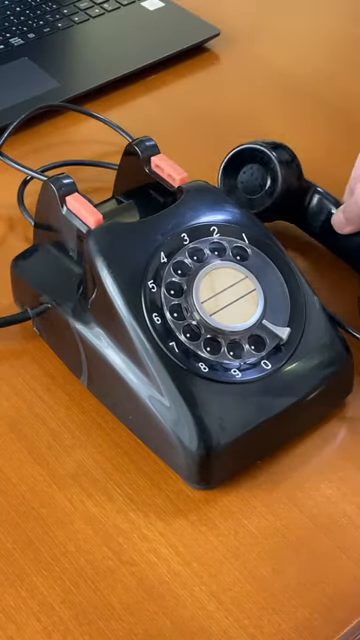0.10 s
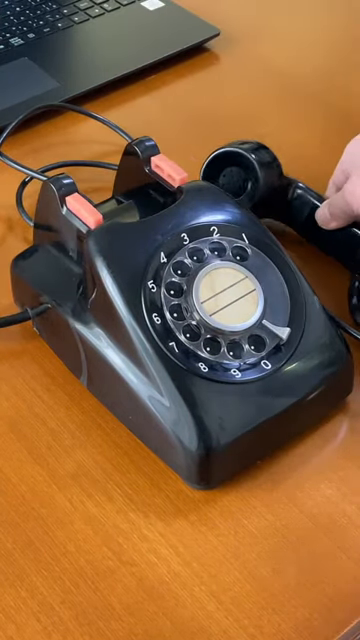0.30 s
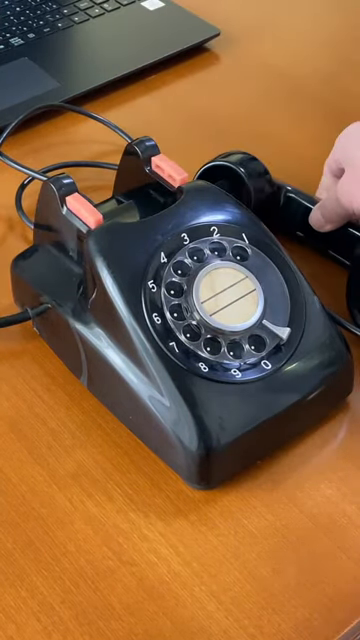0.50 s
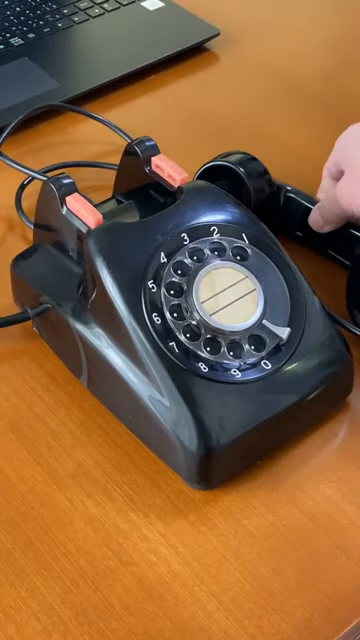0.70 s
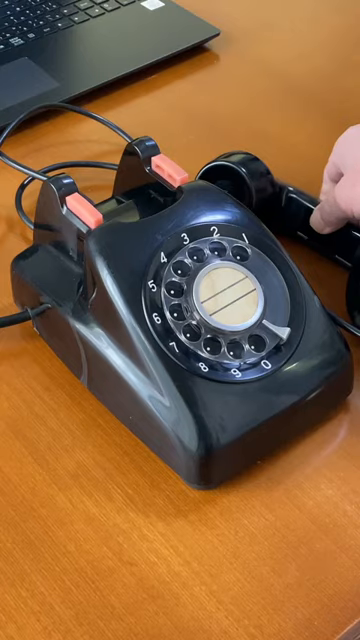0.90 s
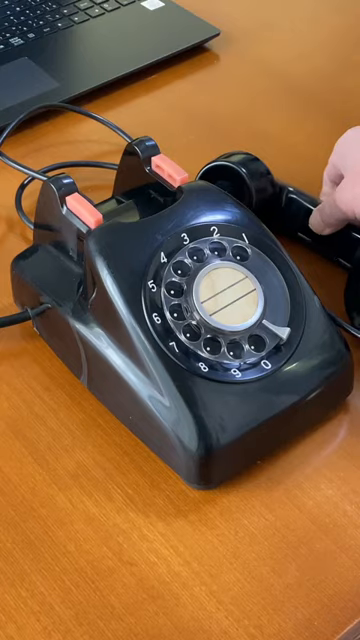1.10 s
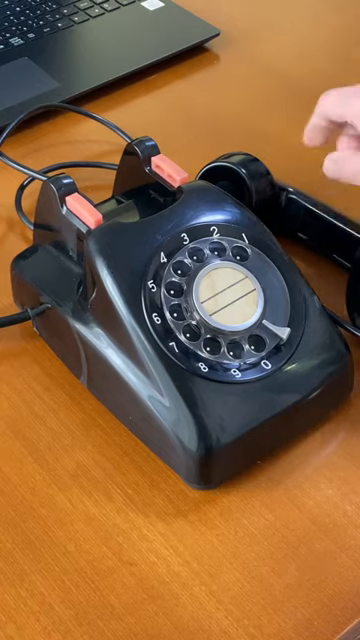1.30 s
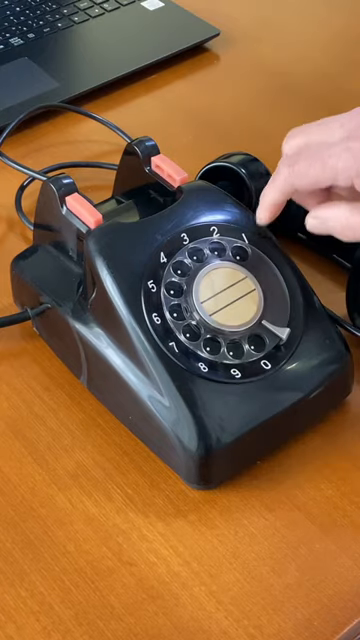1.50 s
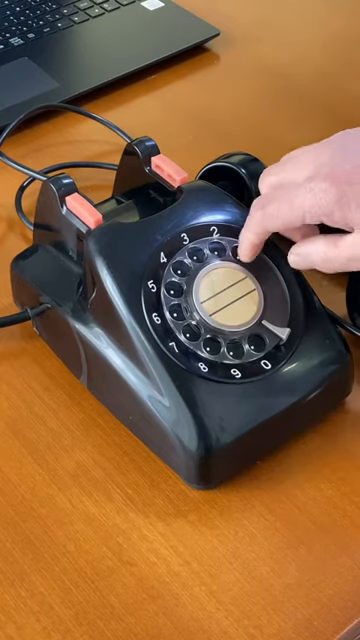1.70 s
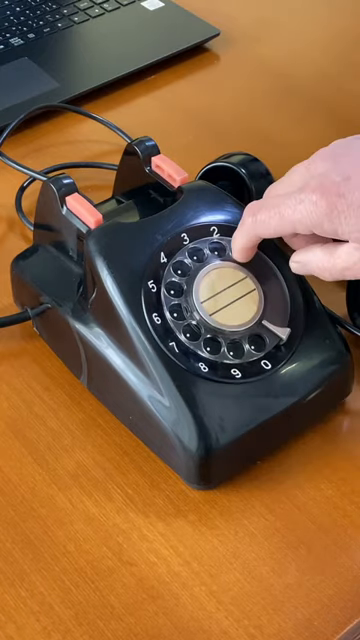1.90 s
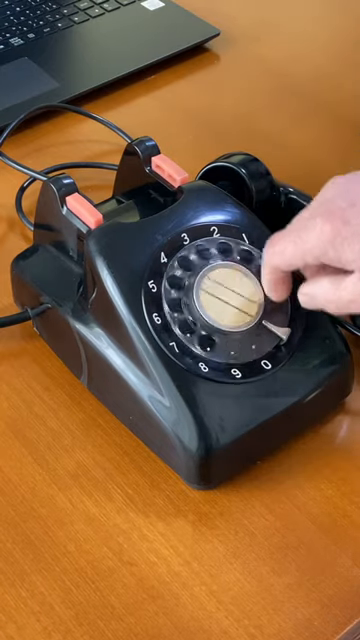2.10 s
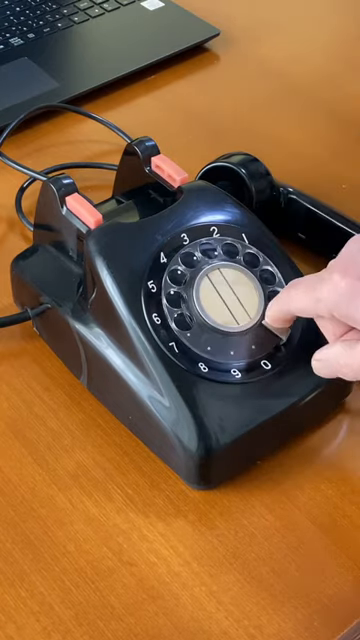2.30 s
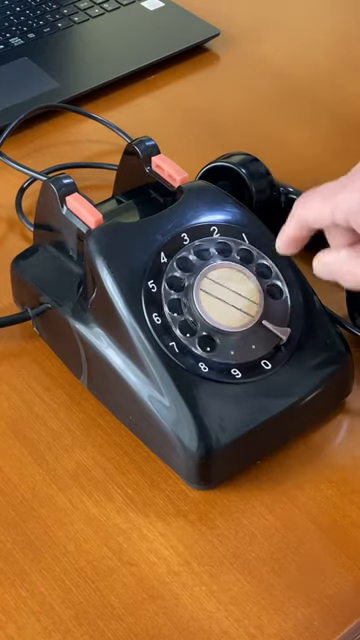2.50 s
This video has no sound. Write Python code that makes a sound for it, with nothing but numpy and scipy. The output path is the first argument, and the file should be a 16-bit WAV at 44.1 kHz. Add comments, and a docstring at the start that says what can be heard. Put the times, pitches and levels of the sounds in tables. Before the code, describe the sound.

A telephone handset clunks onto a wooden desk, then a rotary dial winds and whirs back.

```python
"""A telephone handset knocks down on a wooden desk, one end then the other, each with a small rattle:
its hard shell cracks and the desk thuds and rings. The hand slides softly off it.
A finger winds the rotary dial, gears rasping and ratchet ticking, and lets go; the dial runs back,
governor whirring, contacts clicking. A small room answers, over a low steady hum."""
import sys
import numpy as np
from scipy import signal
from scipy.fft import rfft, irfft
from scipy.io import wavfile
from scipy.ndimage import uniform_filter1d

SR = 44100
rng = np.random.default_rng(int(sys.argv[2]) if len(sys.argv) > 2 else 0)


def transcribe(u):
    """Save the signal u as a 16-bit wav file named by the first command-line argument.

    u: samples, shape (n,) or (channels, n), limited to [-1, 1]; the rate is SR.
    q: integer samples, one column per channel.
    """
    v = np.clip(np.atleast_2d(u).T, -1, 1)
    q = np.round(v * 32767).astype(np.int16)
    wavfile.write(sys.argv[1], SR, q)


N = 114660
HANDSET_LAG_MS, DIAL_LAG_MS = 0.1, -0.113  # handset: left channel behind right; dial: right channel behind left

# handset on desk (time [s], thud [dB], crack [dB], tick [dB])
KNOCKS = [(0.078, -53.5, -64, -74), (0.144, -63.5, -60, -81), (0.2423, -10.5, -33, -36.5),
          (0.245, -26, -25.5, -57), (0.277, -17.5, -29, -43), (0.307, -32.5, -34, -58),
          (0.3502, -6.5, -17, -31.5), (0.353, -22, -30.5, -54.5), (0.3587, -16, -32.5, -53),
          (0.3885, -20, -26, -46), (0.413, -51, -37, -68)]
# shell crack spectrum (frequency [Hz], level [dB])
CRACK_SPECTRUM = [(200, -15.5), (700, -6.5), (1100, -2.5), (1700, 0.5), (1930, -7), (2300, -5),
                  (3000, -8.5), (3800, -18), (4500, -18), (5600, -24.5), (9000, -30.5), (16000, -58.5)]
# shell modes (frequency [Hz], level [dB], t60 [s])
SHELL_MODES = [(1030.6, 3, .09), (1233, 2, 0.16), (1482, -6, 0.19), (1603, 5, .08), (1781, -1, 0.11),
               (2083, -6, 0.22), (2255, 11.5, 0.016), (2345, -5.5, .15), (2778, 4, 0.018), (3314, -10, .11),
               (4394, -5.5, 0.034)]
def handset_knocks():
    """Each knock cracks in the shell; the desk gives way just after."""
    thud_delay_s = 0.0017
    desk_hits = blows([(s + thud_delay_s, db) for s, db, _, _ in KNOCKS], 1)
    shell_hits = blows(KNOCKS, 2)
    thuds = through(desk_hits, desk_response())
    crack = body(CRACK_SPECTRUM, ring_s=0.0022, room_db=-1, coherence=0.53, lag_ms=HANDSET_LAG_MS)
    cracks = amp(-3) * through(shell_hits, crack)
    shell = amp(-3.5) * through(shell_hits, ringing(SHELL_MODES, spread_cycles=0.22))
    ticks = bright_ticks(blows(KNOCKS, 3), ring_s=0.0017, room_db=-7.5, coherence=0.35,
                         lag_ms=HANDSET_LAG_MS)
    return thuds + pan(-0.43) * (cracks + shell) + ticks


# desk and handset modes (frequency [Hz], level [dB], t60 before cap [s], left-right [dB])
DESK_MODES = [(107.3, -18.5, 0.3, 6), (205.45, -4.5, 0.23, 1), (239.8, -11.5, 0.26, 7),
              (259.7, -7.5, 0.29, 3.5), (285, -21, 0.47, 1.5), (312, -17, 0.44, 3.5), (401.9, -8, 0.26, 5),
              (439.4, -9, 0.3, 3.5), (576, -17, 0.38, 5.5), (629, -4, .28, 2), (773.6, -11, 0.22, 0),
              (993, -15, 0.19, 0.5), (995, -16.5, 0.2, -2.5), (1144, -17, 0.21, 2)]
# dull thud spectrum (frequency [Hz], level [dB])
THUD_SPECTRUM = [(40, -32.5), (80, -2), (150, -12), (215, 3.5), (450, 1.5), (640, -5), (860, -11),
                 (1300, -16), (3000, -50.5), (16000, -94.5)]
def desk_response():
    """The struck desk thuds and rings in its modes; a metal part rings on faintly."""
    rise_s, left_lag_s, max_t60_s = 0.0019, 0.00035, 0.42
    t = np.maximum(np.arange(N) / SR - np.array([[left_lag_s], [0]]), 0)
    modes = [(hz, db, min(t60, max_t60_s), side_db) for hz, db, t60, side_db in DESK_MODES]
    modes.append((578, -55.5, 1.7, 3))  # metal part
    ring = sum((-1) ** k * pan(side_db) * amp(db - 60 * t / t60) * np.sin(2 * np.pi * hz * t)
               for k, (hz, db, t60, side_db) in enumerate(modes))
    ring *= 1 - np.exp(-t / rise_s)
    thud = body(THUD_SPECTRUM, ring_s=0.0063, room_db=-1.5, coherence=0.2415, lag_ms=0.16)
    return amp(2) * ring / np.linalg.norm(ring[0]) + amp(-3.5) * pan(2.1) * thud


# bright tick spectrum (frequency [Hz], level [dB])
TICK_SPECTRUM = [(500, -25.5), (2500, 0), (4500, -2.5), (5600, -8), (6700, 0.5), (8700, 1.5), (10500, -3),
                 (11800, -25), (14000, -5.5), (16000, -19.5)]
def bright_ticks(hits, **settings):
    """The treble edge of each impact, on handset or dial."""
    return through(hits, body(TICK_SPECTRUM, **settings))


# slide envelope (time [s], level [dB])
SLIDE_ENVELOPE = [(0.06, -74.5), (0.09, -71), (0.2, -72), (0.222, -58.5), (0.24, -38.5), (0.26, -49),
                  (0.325, -47), (0.347, -25.5), (0.36, -48.5), (0.6, -75.5), (0.66, -94)]
# slide spectrum (frequency [Hz], level [dB])
SLIDE_SPECTRUM = [(100, -13.5), (220, 0.5), (500, 0), (900, -17.5), (2500, -16), (4700, -27.5), (6000, -42),
                  (16000, -57.5)]
def handset_slide():
    """The handset catches and rubs on the wood as it settles."""
    friction = envelope(SLIDE_ENVELOPE) * rasp(rate_hz=298.3, jitter=0.4, rough=1, rub=0.79)
    return through(friction, body(SLIDE_SPECTRUM, ring_s=0.0023, room_db=0.5, coherence=0.783))


# ratchet ticks (time [s], level [dB])
RATCHET_TICKS = [(1.978, -59.5), (1.9905, -56), (2.0415, -47), (2.046, -70), (2.086, -62), (2.091, -49),
                 (2.0988, -43), (2.1285, -67), (2.1375, -57), (2.1455, -50.5), (2.15, -61), (2.1715, -56.5),
                 (2.182, -81)]
# ratchet spectrum (frequency [Hz], level [dB])
RATCHET_SPECTRUM = [(300, -7.5), (2000, -7), (4500, 3), (5500, -8.5), (6500, -1), (8700, 2.5), (10200, -7),
                    (11700, -36), (14300, 5.5), (16000, -7.5)]
# gear envelope (time [s], level [dB])
GEAR_ENVELOPE = [(1.955, -70), (1.967, -60), (2.04, -56.5), (2.07, -56), (2.1, -52.5), (2.145, -49),
                 (2.18, -59.5), (2.21, -77.5), (2.27, -104), (2.295, -74), (2.33, -82)]
# gear spectrum (frequency [Hz], level [dB])
GEAR_SPECTRUM = [(200, -22), (400, -4), (750, -22.5), (1180, -1.5), (1650, -8.5), (2200, -21),
                 (4400, -20.5), (5500, -50.5), (8600, -25), (11700, -47), (15000, -27)]
# finger wheel modes (frequency [Hz], level [dB], t60 [s])
WHEEL_MODES = [(430, -12.5, 0.059), (1220, -7, 0.072), (1154, -2.5, 0.071), (1300, -5.5, 0.054),
               (1407.4, -4, 0.042), (1529, -2.5, 0.03), (1650, 0, 0.074), (1715, 0, 0.061)]
def dial_winding():
    """The finger drives the gears; their teeth ring the wheel while the ratchet ticks."""
    teeth = envelope(GEAR_ENVELOPE) * rasp(rate_hz=161.2, jitter=0.22, rough=0.45, rub=0.3)
    ratchet = body(RATCHET_SPECTRUM, ring_s=0.0039, room_db=-11, coherence=0.79, lag_ms=DIAL_LAG_MS)
    gears = body(GEAR_SPECTRUM, ring_s=0.0026, room_db=-9.5, coherence=0.13, lag_ms=DIAL_LAG_MS)
    ticks = through(blows(RATCHET_TICKS, 1), ratchet)
    wheel = amp(-3) * through(teeth, ringing(WHEEL_MODES, spread_cycles=0.46))
    return ticks + amp(-0.5) * through(teeth, gears) + wheel


# governor envelope (time [s], level [dB])
GOVERNOR_ENVELOPE = [(2.33, -75), (2.36, -56), (2.378, -51), (2.386, -50.5), (2.435, -45.5), (2.465, -46.5),
                     (2.52, -50), (2.6, -49.5)]
# governor spectrum (frequency [Hz], level [dB])
GOVERNOR_SPECTRUM = [(230, -17.5), (420, 8), (700, 1.5), (1200, 2.5), (1450, 0), (2000, -19), (2550, -17.5),
                     (3200, -5.5), (4300, -8), (5500, -23), (6500, -13.5), (8700, -13.5), (12000, -36),
                     (15000, -49)]
# catch and pulse contacts (time [s], clack [dB], case knock [dB], ping [Hz], ping [dB], tick [dB])
CLACKS = [(1.96, -71.5, -86, 2290, -62.5, -72), (2.382, -44, -44.5, 1178, -44, -60),
          (2.407, -49, -47, 1162, -48, -57), (2.4183, -48, -40.5, 2500, -49.5, -54),
          (2.4314, -49, -41, 1200, -51, -46.5), (2.4362, -45.5, -47, 2530, -55, -56),
          (2.5145, -47.5, -76, 2248, -48, -59), (2.523, -49, -60, 2293, -49, -50.5),
          (2.551, -54, -56, 2470, -48.5, -65), (2.555, -57, -53, 1212, -43, -69),
          (2.569, -57, -57, 862, -53, -72), (2.578, -50.5, -55, 1250, -57, -65)]
# clack spectrum (frequency [Hz], level [dB])
CLACK_SPECTRUM = [(250, -5.5), (420, 7), (700, -18), (1200, 7), (1900, 0), (2400, -1), (3200, -5.5),
                  (4300, -42), (5600, -26), (16000, -48)]
# dial mechanism modes (frequency [Hz], level [dB], t60 [s])
DIAL_MODES = [(418, -6, .15), (426, 10, 0.1), (877.3, 0.5, 0.3), (1033, 1.5, 0.23), (1149, -14, 0.15),
              (1224, 6.5, .12), (2270, -2, 0.049), (2536, 0.5, 0.07), (2694, 3.5, 0.046), (4450, -9, 0.051)]
# hollow case modes (frequency [Hz], level [dB], t60 [s])
CASE_MODES = [(389, -15, 0.18), (411.4, 6, 0.12), (430, -2, 0.17), (510, -6, 0.17), (654, -5.5, 0.22)]
def dial_return():
    """The governor whirs in the dial's modes; catch and contacts clack, ping and knock in the case."""
    ping_t60_s = 0.062
    mechanism = ringing(DIAL_MODES, spread_cycles=0.38)
    teeth = envelope(GOVERNOR_ENVELOPE) * rasp(rate_hz=243.7, jitter=0.12, rough=0.28, rub=0.53)
    hits = blows(CLACKS, 1)
    governor = body(GOVERNOR_SPECTRUM, ring_s=0.0026, room_db=-5, coherence=0.53, lag_ms=DIAL_LAG_MS)
    contact = body(CLACK_SPECTRUM, ring_s=0.0015, room_db=0, coherence=0.34, lag_ms=DIAL_LAG_MS)
    whirr = amp(-6) * through(teeth, governor)
    clacks = amp(-1.5) * through(hits, contact)
    ticks = bright_ticks(blows(CLACKS, 5), ring_s=0.0029, room_db=-7, coherence=0.53, lag_ms=DIAL_LAG_MS)
    knocks = pan(4) * through(blows(CLACKS, 2), ringing(CASE_MODES, spread_cycles=0.12))
    pings = sum(through(blows([(s, db)], 1), ringing([(hz, 0, ping_t60_s)], spread_cycles=0.44))
                for s, _, _, hz, db, _ in CLACKS)
    ring = through(amp(-4.5) * teeth + hits, mechanism)
    return whirr + clacks + ticks + knocks + pings + ring


# hand friction envelope (time [s], level [dB])
HAND_ENVELOPE = [(1.02, -84), (1.08, -60), (1.18, -63.5), (1.23, -82), (1.62, -97), (1.67, -73.5),
                 (1.72, -98)]
# hand friction spectrum (frequency [Hz], level [dB])
HAND_SPECTRUM = [(100, -21.5), (220, 0.5), (400, 0), (520, 3), (620, -12.5), (740, -8), (950, -19.5),
                 (2500, -21), (3600, -21.5), (4600, -12), (5700, -32.5), (9000, -26), (16000, -46)]
def hand_slide():
    """The hand rubs softly off the handset and reaches for the dial."""
    friction = envelope(HAND_ENVELOPE) * rng.standard_normal(N)
    return through(friction, body(HAND_SPECTRUM, ring_s=0.004, room_db=-7, coherence=0.12))


# hum partials (frequency [Hz], level [dB], left-right [dB])
HUM_PARTIALS = [(48.45, -39, 5.5), (98.5, -61.5, 7), (142.7, -75, 2.5), (206, -77.5, 7), (591.7, -93, 4.5)]
# hum swell (time [s], gain [dB])
HUM_SWELL = [(0, 0.92), (0.6, 0.14), (0.93, -0.23), (1.07, -1.73), (1.2, 0.29), (1.6, -0.033), (1.82, -1.3),
             (1.95, 0.55), (2.2, 0.14), (2.4, -1.2), (2.6, 0.32)]
def hum():
    """Low tones that waver slightly together."""
    t = np.arange(N) / SR
    swell = amp(np.interp(t, *np.transpose(HUM_SWELL)))
    return swell * sum(pan(side_db) * amp(db) * np.sqrt(2) * np.sin(2 * np.pi * (hz * t + rng.random()))
                       for hz, db, side_db in HUM_PARTIALS)


# air spectrum (frequency [Hz], level [dB])
AIR_SPECTRUM = [(20, -7), (50, -4), (100, 4), (140, -4), (280, -7.5), (400, -21.5), (600, -25.5),
                (800, -34), (2000, -31), (5500, -39), (8500, -30), (12000, -42), (16000, -38)]
def room_air():
    """Quiet, dark noise, partly common to both channels."""
    noise = rng.standard_normal(N) + 0.81 * rng.standard_normal((2, N))
    return amp(-67.5) * pan(2) * unit_rms(through(noise, colour(AIR_SPECTRUM)))


# room decay (frequency [Hz], t60 [s])
ROOM_DECAY = [(80, 0.7), (200, 0.42), (330, 0.3), (620, .39), (1000, 0.37), (2000, 0.28), (4000, .27),
              (8000, 0.21), (15000, 0.2)]
def room_tail(coherence):
    """Dense reflections of a small room; the bass lasts longest."""
    rise_s = 0.0029
    hz, age_s, reflections = signal.stft(taps(coherence), SR, nperseg=256)
    decay = amp(-60 * age_s / at_hz(ROOM_DECAY, hz)[:, None])
    tail = signal.istft(reflections * decay, SR, nperseg=256)[1][:, :N]
    return tail * np.minimum(np.arange(N) / SR / rise_s, 1)


def body(spectrum, ring_s, room_db, coherence, lag_ms=0):
    """Response of a struck part: a snap, a short dense ring and the room's tail."""
    t = np.arange(N) / SR
    near = unit_energy(taps(coherence) * np.exp(-t / ring_s))
    near[:, 0] += 0.4  # snap
    late_side = int(lag_ms < 0)
    near[late_side] = np.interp(t - abs(lag_ms) / 1000, t, near[late_side], left=0)
    tail = room_tail(coherence * 0.19)
    tone = colour(spectrum)
    return unit_energy(through(near, tone)) + amp(room_db) * unit_energy(through(tail, tone))


def ringing(modes, spread_cycles):
    """Decaying modes, each with a random phase offset between channels."""
    t = np.arange(SR // 2) / SR
    ring = 0
    for hz, db, t60 in modes:
        cycles = hz * t + rng.random() + spread_cycles * rng.random((2, 1))
        ring += amp(db - 60 * t / t60) * np.sin(2 * np.pi * cycles)
    return unit_energy(ring)


def rasp(rate_hz, jitter, rough, rub):
    """Uneven small impacts with sliding friction between them."""
    drift = unit_rms(uniform_filter1d(rng.standard_normal(N), 300))
    cycles = np.cumsum(rate_hz * (1 + jitter * drift)) / SR
    onsets = np.diff(np.floor(cycles), prepend=0) > 0
    impacts = onsets * np.exp(rough * rng.standard_normal(N))
    return unit_rms(unit_rms(impacts) + rub * rng.standard_normal(N))


def taps(coherence):
    """Two sparse trains of random-sign taps; alike in the bass, partly alike above."""
    step, mono_hz = 8, 378
    slots = np.arange(0, N - step, step)
    shape = (2, len(slots))
    trains = np.zeros((2, N))
    np.put_along_axis(trains, slots + rng.integers(0, step, shape), rng.choice([-1., 1.], shape), 1)
    alike = coherence + (1 - coherence) / (1 + (np.fft.rfftfreq(N, 1 / SR) / mono_hz) ** 4)
    mid, side = rfft(trains) * np.sqrt(abs(np.array([1 + alike, 1 - alike])) / 2)
    return irfft(np.array([mid + side, mid - side]), N)


def blows(table, column):
    """One impulse per row; the column gives its rms over 5 ms in dB."""
    hits = np.zeros(N)
    for row in table:
        hits[round(row[0] * SR)] += amp(row[column]) * np.sqrt(0.005 * SR)
    return hits


def colour(spectrum, size=4096):
    """Minimum-phase impulse response with the given spectrum."""
    log_gain = np.log(amp(at_hz(spectrum, abs(np.fft.fftfreq(size, 1 / SR)))))
    transfer = np.exp(np.conj(signal.hilbert(log_gain)))
    return unit_energy(np.fft.ifft(transfer).real[None, :size // 2])


def envelope(points):
    """Gain over time from a dB curve; silent outside it."""
    t, db = np.transpose(points)
    return amp(np.interp(np.arange(N) / SR, t, db, left=-140, right=-140))


def at_hz(points, hz):
    """Table lookup on a log-frequency axis."""
    table_hz, value = np.transpose(points)
    return np.interp(np.log(hz + 1), np.log(table_hz + 1), value)


def through(x, response):
    return signal.fftconvolve(np.atleast_2d(x), response, axes=1)[:, :N]


def amp(db):
    return 10 ** (np.asarray(db) / 20)


def pan(side_db):
    return amp([[side_db / 2], [-side_db / 2]])


def unit_rms(x):
    return x / np.sqrt(np.mean(x ** 2) + 1e-20)


def unit_energy(x):
    return x / np.sqrt(np.sum(x ** 2, -1, keepdims=True) + 1e-20)


def scene():
    """Handset, hand, dial and room."""
    handset = handset_knocks() + handset_slide()
    return handset + hand_slide() + dial_winding() + dial_return() + hum() + room_air()


def record(dry):
    """Low-pass at 16.1 kHz."""
    lowpass = signal.firwin(511, 16100, window=("kaiser", 9), fs=SR)
    return signal.oaconvolve(dry, lowpass[None], "same")


dry = scene()
out = record(dry)
transcribe(out)
```